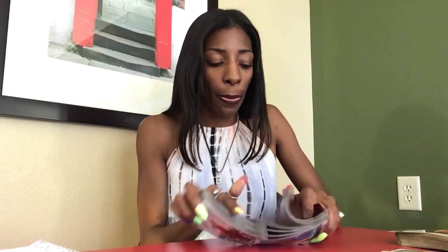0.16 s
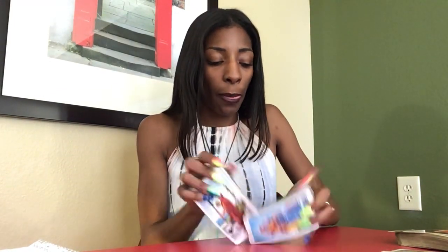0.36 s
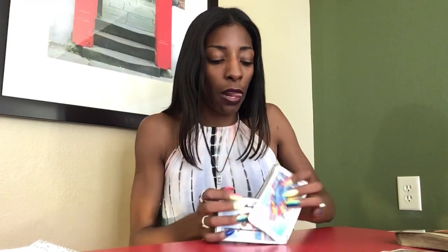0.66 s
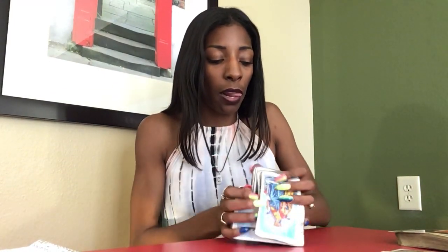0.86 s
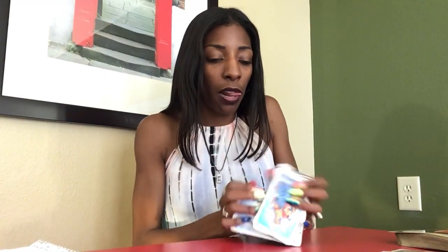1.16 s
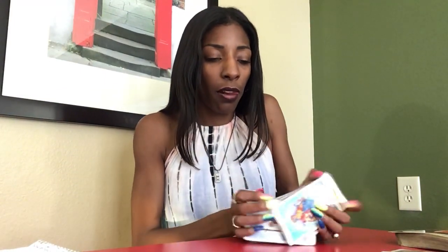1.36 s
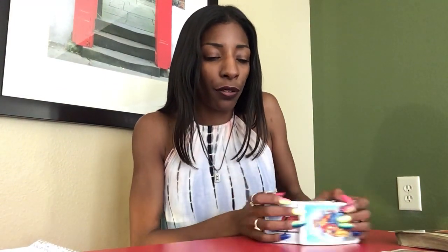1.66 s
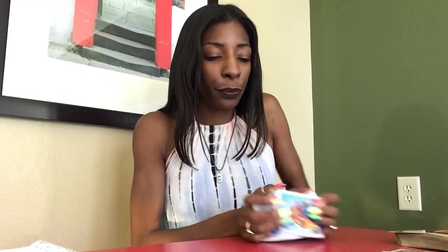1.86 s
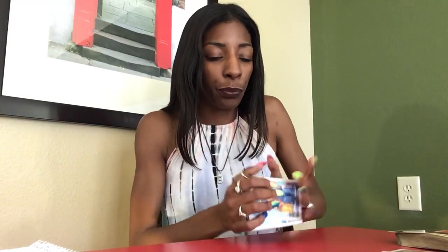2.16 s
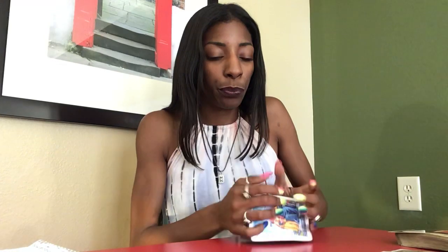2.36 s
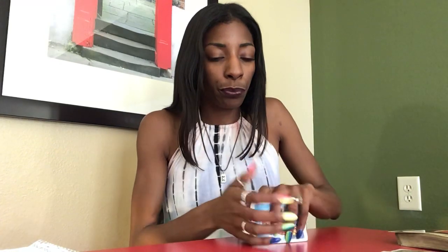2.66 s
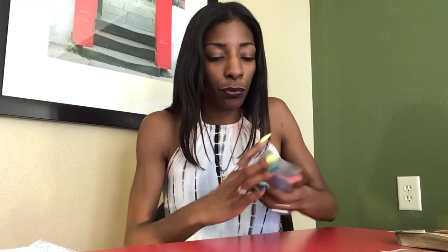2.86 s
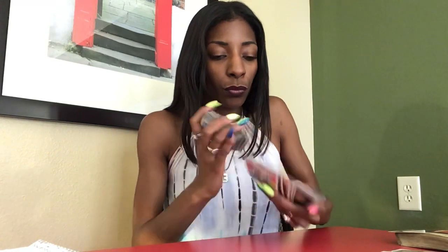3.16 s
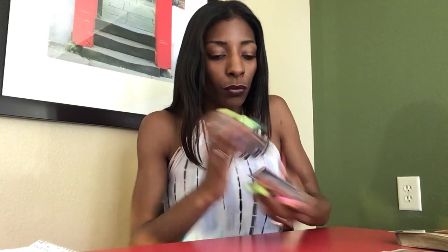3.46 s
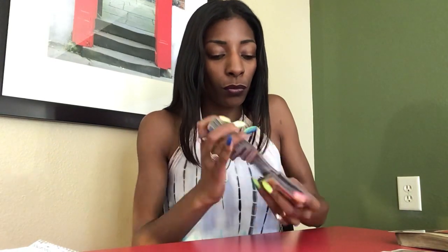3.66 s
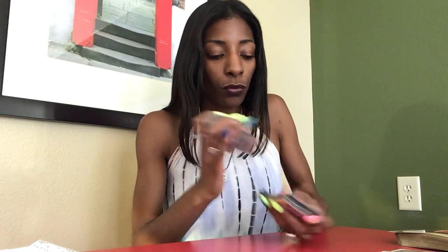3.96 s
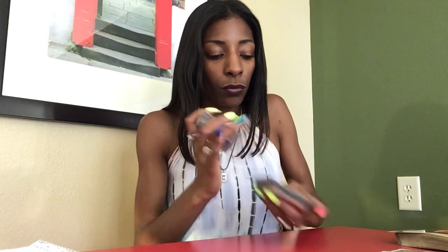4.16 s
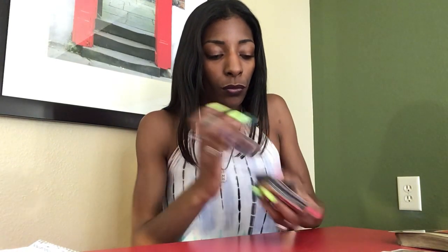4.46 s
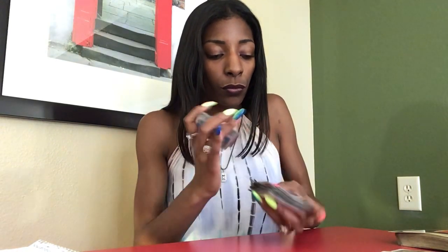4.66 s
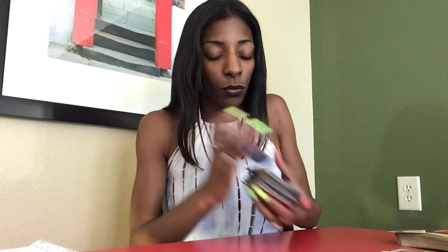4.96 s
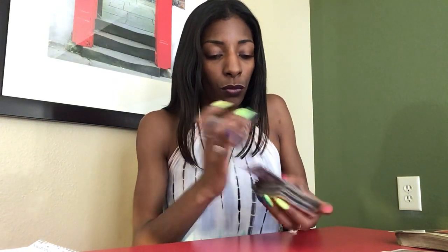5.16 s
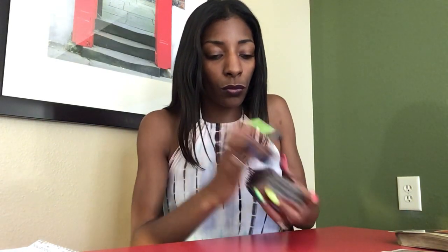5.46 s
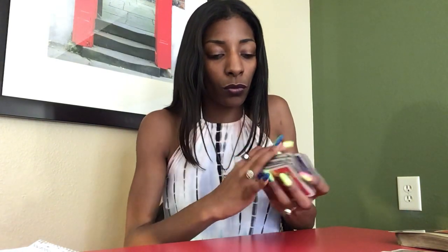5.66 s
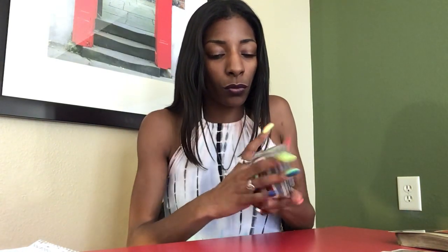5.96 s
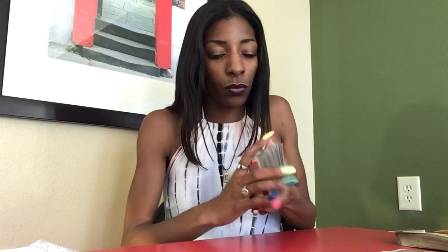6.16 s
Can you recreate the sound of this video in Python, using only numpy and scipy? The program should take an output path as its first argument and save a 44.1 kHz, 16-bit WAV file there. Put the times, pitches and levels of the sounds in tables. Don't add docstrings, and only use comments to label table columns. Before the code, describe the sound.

A stiff card deck riffles in a fast crackling burr, then is knocked square on a table and softly shuffled in the hand.

```python
import sys
import numpy as np
from scipy import signal
from scipy.fft import rfft, irfft
from scipy.io import wavfile

SR = 44100
rng = np.random.default_rng(int(sys.argv[2]) if len(sys.argv) > 2 else 0)


def voltage_ratio(level):
    return 10 ** (np.asarray(level, float) / 20)


def log_audio(samples):
    frames = np.atleast_2d(samples).T
    limited = np.clip(frames, -1, 1)
    pcm = np.round(limited * 32767).astype(np.int16)
    wavfile.write(sys.argv[1], SR, pcm)


N = 277830

# [t/s, level/dB, f/Hz, brightness/dB, length/ms]
RIFFLE_SNAPS = [(.1643, -25, 1230, -2, 2.5), (.1722, -29, 1822, -1, 3), (.1823, -37, 2120, -12.5, 3.8),
                (.1864, -27, 1577, -12.5, 2.6), (.1901, -29.5, 1640, 0.5, 2.8), (.1944, -19, 1300, 1, 1.8),
                (.1963, -22.5, 1169, 3, 2), (.2008, -32.5, 1815, -6, 3), (.2056, -20.5, 1506, -7.5, 2),
                (.2098, -33.5, 2720, -15, 2), (.2146, -23, 2293, -8, 3), (.2158, -18.5, 3588, 2.5, 2.6),
                (.2176, -19, 2020, 0, 2.3), (.2277, -18, 3584, -5.5, 2), (.2328, -22, 2116, -3, 2),
                (.2341, -23.5, 2011, 2.5, 2), (.2417, -17.5, 1408, -13.5, 3), (.245, -18, 982, -12, 2.1),
                (.2507, -25, 1395, -10.5, 2), (.2532, -20, 901.5, -8, 3), (.2617, -24.5, 1222, -14.5, 3),
                (.2702, -11, 2628, -10.5, 1.2), (.2708, -13.5, 1879, -10.5, 1.5), (.28, -29, 2605, -1.5, 2),
                (.2812, -20, 2875, -8.5, 2.5), (.2872, -14, 1468, -8, 1.5), (.2907, -29, 900, -8, 2),
                (.2955, -33, 3137, -6, 2.5), (.2981, -28, 3060, -9.5, 2), (.3014, -28, 3614, -6, 2.5),
                (.3135, -32, 2238, -6, 2), (.3167, -28, 1598, -11, 2), (.319, -20, 2534, -15.5, 3.5),
                (.323, -15.5, 2400, -9.5, 2.6), (.3261, -21, 1420, -9, 2), (.3292, -9.5, 2252, -14.5, 3.17),
                (.3386, -12, 2217, -8.5, 4.2), (.3421, -17, 1456, -11, 2.5), (.348, -14, 1770, -5, 2.6),
                (.3594, -28, 1545, 2, 2.4)]
# [t/s, level/dB, f/Hz, brightness/dB, length/ms]
CARD_PATS = [(1.052, -68, 2500, -6, 2.3), (1.3614, -44, 1560, -28.5, 2.4), (1.663, -59.5, 1026, -21.5, 4),
             (1.676, -49.5, 3870, -12.5, 3), (1.6865, -52, 1160, -5, 3.2), (1.776, -57, 4200, -10, 2),
             (1.832, -50, 3870, -10, 2), (2.0997, -47.5, 1690, -16, 3.4), (2.385, -19, 2000, -21.5, 6.3),
             (2.383, -30, 4200, -21, 14), (2.392, -30, 4200, -21.5, 11), (2.5455, -36.5, 1530, -30, 3.3),
             (2.558, -30, 2370, -25, 4.6), (2.9478, -69.5, 925, -8, 1.74), (3.012, -69.5, 4200, -9, 2.9),
             (3.132, -63.5, 2070, -9.5, 2), (3.205, -44.5, 2570, -11, 4.3), (3.66, -50, 700, -12, 4.8),
             (3.669, -57.5, 3120, -13.5, 3.3), (3.698, -57, 896, -13, 3), (4.188, -59.5, 1087, -14.5, 4.4),
             (4.255, -38, 1595, -20.5, 4.3), (4.9538, -52, 1890, -4.5, 3.3), (4.971, -52, 900, -11.5, 6.6),
             (4.9764, -53, 860, -11, 5.5), (4.992, -53, 1380, -12.5, 4), (5.0, -53, 1557, -9, 3.3),
             (5.243, -47, 664, -15.5, 3.5)]
# [t/s, level/dB, f/Hz, brightness/dB]
NAIL_TICKS = [(.0275, -59, 1760, -4), (.076, -46, 806, -8), (0.6459, -45, 1300, 5.5),
              (0.7135, -42, 3500, -1), (.792, -50, 4060, -8), (0.856, -44, 3720, -15),
              (0.871, -31.5, 3830, 0), (0.9536, -41, 2800, -8), (0.9661, -37.5, 3090, -7),
              (1.078, -37.5, 3050, -8), (1.106, -49, 1520, -7), (1.1628, -42, 3450, -9),
              (1.195, -39.5, 2600, -6.5), (1.2042, -48.5, 3170, -18), (1.312, -42.5, 1830, 3.5),
              (1.426, -59, 3610, -13), (1.4726, -46, 3720, -23), (1.5166, -63, 3780, 3.5),
              (1.698, -40.5, 2580, 3), (1.7515, -24, 3370, -5), (1.759, -26, 3000, -8),
              (1.8546, -41.5, 3680, -3.5), (2.0558, -46, 1640, -7), (2.0896, -37.5, 2810, -5),
              (2.3054, -55.5, 1650, -1.5), (2.435, -43.5, 4450, 6), (2.4505, -44.5, 4020, 4),
              (2.625, -39.5, 2400, 3.5), (2.6263, -34, 2400, 0), (3.072, -57.5, 1132, 2.5),
              (2.1332, -46, 3000, 1.5)]
# [t/s, level/dB, f/Hz, length/ms]
EDGE_BLOWS = [(.0655, -49.5, 570, 4.4), (0.1444, -49, 780, 1), (0.6857, -48, 1400, 2.9),
              (.696, -34.5, 1100, 3.7), (0.8342, -30, 1470, 2.9), (.8617, -45.5, 810, 9.2),
              (1.3625, -37.5, 776, 7.5), (1.3748, -52, 950, 1.1), (2.1201, -32, 1320, 2.4),
              (2.125, -42.5, 1070, 17), (2.186, -33, 1486, 3), (2.3714, -29.5, 2250, 20),
              (2.3768, -25, 1300, 8.5), (2.3834, -21, 1310, 12), (2.3912, -15.5, 2060, 14),
              (2.3974, -24.5, 1350, 3.7), (2.528, -27.5, 1670, 1.8), (2.5359, -38, 990, 3.5),
              (2.5483, -28, 1800, 5.8), (2.5567, -26, 1680, 3.2), (5.2308, -47.5, 860, 3.5),
              (5.2372, -53, 670, 12)]
# [t/s, level/dB, f/Hz, length/ms]
PACKET_SLAPS = [(2.7604, -36.5, 988, 3.3), (3.219, -42.5, 1153, 5.2), (3.24, -44.5, 1600, 1.9),
                (3.3735, -57, 2300, 14), (3.3968, -52, 1750, 7.4), (3.448, -50.5, 1750, 14),
                (3.5042, -48.5, 666, 14), (3.712, -43.5, 796, 2.4), (3.978, -59, 1474, 9),
                (3.9982, -44, 790, 13), (4.2525, -42.5, 964, 2.2), (4.398, -53, 1780, 2.9),
                (4.4185, -45.5, 1390, 2.65), (4.478, -51, 820, 4.5), (4.5129, -46.5, 692, 5.2),
                (4.6493, -56, 1820, 11), (4.6567, -36.5, 1890, 5), (4.661, -37, 1910, 4.5),
                (4.667, -45.5, 1736, 3.1), (4.7305, -45.5, 609, 17), (4.941, -51, 798, 4.4),
                (5.137, -55, 640, 17), (5.4535, -35, 710, 23), (5.4574, -39.5, 4060, 3.8),
                (5.465, -41, 4200, 5.6), (5.6288, -50, 650, 4.1), (2.6428, -48.5, 1390, 4.6),
                (5.774, -63, 1803, 2.5)]
# [t/s, level/dB]
CORNER_CATCHES = [(3.213, -44.5), (3.432, -51), (3.456, -53), (3.6, -56), (3.636, -50), (3.725, -47.5),
                  (3.8726, -51), (4.472, -45.5), (4.525, -46.5), (4.909, -55.5), (5.133, -49.5),
                  (5.38, -51)]
# [t/s, level/dB]
RIM_FLICKS = [(.2057, -29), (.2277, -24.5), (.2325, -35), (.2415, -36.5), (0.3015, -32.5), (.319, -31),
              (.3292, -28), (.3482, -16), (.3595, -32), (.3693, -32), (.2165, -27)]
# [t/s, level/dB, f/Hz, length/ms]
PACKET_SPRINGS = [(.2708, -9.5, 3600, .8), (.6885, -37.5, 780, 8.9), (.6965, -29, 1400, 4.2),
                  (2.5281, -40.5, 4000, 2.2), (.3295, -16.5, 2300, 1.5), (4.6554, -39, 1900, 1.3),
                  (.8562, -40, 3700, 3.2), (.2418, -20.5, 1901, 2), (.2535, -21, 1300, 1.5),
                  (1.0813, -46.5, 2900, 1), (1.164, -50, 1500, 1.5), (1.196, -40.5, 3700, 1.3),
                  (1.7525, -43, 800, 5), (2.1206, -39, 2310, 1.6), (2.1865, -34, 2130, 1.8),
                  (2.384, -11.5, 1210, 5), (2.3865, -11, 2060, 2.4), (2.3916, -11.5, 2056, 3.4),
                  (2.3957, -12.5, 1330, 3.1), (2.5482, -25, 2430, 3.3), (2.5568, -18, 1470, 2.14),
                  (2.5566, -23, 2450, 2.7), (3.2125, -34.5, 2720, 2.4), (3.2197, -39, 2600, 2.5),
                  (3.2414, -44.5, 1550, 1.5), (3.428, -53.5, 2750, 2.2), (3.4538, -47, 3040, 3),
                  (3.503, -46.5, 520, 3), (3.668, -49.5, 3150, 5), (3.726, -48.5, 2700, 2.9),
                  (4.2537, -39.5, 1106, 2.7), (4.397, -42.5, 1150, 1.7), (4.3968, -47, 2400, 1.8),
                  (5.157, -54.5, 2890, 2), (5.2312, -37, 900, 2.2), (5.2315, -41.5, 1610, 3)]
# [t/s, peak level/dB, low modes/dB, high modes/dB]
TABLE_KNOCKS = [(0.07, -50, 14, -5), (0.162, -35.5, 14, -2.5), (0.196, -21, 3, -10.5), (0.213, -27, 3, -8),
                (0.23, -25.5, -21, 1), (0.242, -25, 13, -1.5), (0.268, -24.5, 14, -2), (0.288, -31, 15, 2),
                (0.318, -22, 3, -8), (0.332, -20, -19, -3.5), (.348, -26, 11, -7), (0.6888, -21, 3, -8),
                (0.697, -16, 5.5, -6), (0.863, -41, 10, 3), (0.9, -38, -9, -6), (1.251, -36, 7, -19),
                (1.361, -24.5, 6.5, -10.5), (1.427, -39, -1.5, -19.5), (1.647, -38, -9.5, -10),
                (1.733, -32, -11, -15.5), (1.806, -32.5, -15, -12), (2.095, -39, 11.5, -4.5),
                (2.122, -33, -26, -6.5), (2.136, -33, -18.5, -7.5), (2.186, -35.5, -23, -6),
                (2.373, -18.5, -30.5, -29), (2.391, -14, -17, -20.5), (2.528, -29, 1, -9),
                (2.557, -19.5, 7.5, -11), (2.763, -30, -27.5, -10)]
# [t/s, peak level/dB]
PALM_THUDS = [(3.208, -55), (3.504, -50.5), (3.997, -46), (4.252, -42), (4.514, -46.5), (4.73, -42.5),
              (5.231, -40.5), (3.66, -60), (3.725, -52.5), (4.42, -54.5), (4.97, -59.5), (5.453, -48),
              (5.63, -56.5)]
# [f/Hz, t60/s, level/dB]
KNOCK_MODES = [
    [(106, 0.081, -9.5)],
    [(157.2, 0.13, -6), (250, 0.089, -17)],
    [(307, 0.05, 2.5), (378, 0.033, -1)],
    [(498.3, 0.024, 0.5), (646, 0.033, 1)],
]
# [f/Hz, t60/s, level/dB]
WOOD_MODES = [(637.4, 0.07, -22.5), (830, 0.054, -6.5), (1160, 0.063, -6.5), (1390, 0.047, -9.5),
              (1750, 0.075, -21)]
# [t/s, length/s, rub level/dB, rub f/Hz, hiss level/dB]
SETTLING_SLIDES = [(.065, 0.016, -56.5, 730, -68), (.141, 0.014, -52, 1120, -73),
                   (.648, 0.039, -60, 2830, -56.5), (.697, 0.04, -51, 1100, -71),
                   (.836, 0.015, -48.5, 1010, -92), (1.351, 0.032, -70, 780, -81),
                   (2.402, 0.04, -43.5, 2473, -56), (2.4, .05, -57, 4036, -69),
                   (2.531, 0.082, -50, 1700, -74), (2.628, 0.022, -52, 1557, -63),
                   (2.757, 0.084, -63, 1262, -67), (3.205, 0.058, -53.5, 2410, -59),
                   (3.372, 0.043, -66.5, 2340, -73), (3.656, 0.035, -58, 2800, -56),
                   (4.395, 0.057, -60, 1195, -67.5), (4.46, 0.053, -62, 1610, -60.5),
                   (4.511, 0.036, -60.5, 1064, -59.5), (4.654, 0.11, -57.5, 1550, -62),
                   (5.458, 0.053, -62, 4690, -65), (5.821, 0.066, -78, 1420, -68.5)]
# [t/s, length/s, rub level/dB, rub f/Hz, hiss level/dB]
EVEN_DRAWS = [(.868, 0.068, -60, 2900, -88), (1.54, 0.056, -69, 3800, -73),
              (1.753, 0.074, -58, 3214, -66.5), (3.428, 0.11, -62.5, 2575, -66),
              (3.6, 0.026, -75.5, 1250, -73), (3.632, 0.023, -61, 2770, -71),
              (3.699, 0.046, -59, 1500, -63), (4.187, 0.11, -60.5, 1467, -65),
              (4.891, 0.06, -69.5, 1269, -65), (5.127, 0.08, -62, 2400, -60.5),
              (5.229, 0.028, -54.5, 1070, -65.5), (5.378, 0.059, -62, 2860, -61),
              (5.632, 0.045, -60.5, 1637, -58.5), (5.982, 0.041, -84.5, 1005, -80),
              (6.099, 0.048, -82, 1198, -70.5)]
# [t/s, length/s, rub level/dB, rub f/Hz, hiss level/dB]
GATHERING_PUSHES = [(1.25, 0.088, -65.5, 2940, -72.5), (1.651, 0.063, -64, 2660, -74),
                    (1.89, 0.085, -70, 3880, -63.5), (2.056, 0.069, -58, 1134, -73.5),
                    (2.126, 0.033, -52.5, 1030, -64), (2.157, 0.026, -57, 3060, -60),
                    (2.999, 0.11, -94, 1280, -91), (3.859, 0.058, -69, 1530, -67),
                    (3.955, 0.066, -66, 1485, -64.5), (4.936, 0.068, -59, 1460, -67.5)]
# [t/s, length/s, rub level/dB, rub f/Hz, hiss level/dB, swell/dB]
THUMB_FANNING = [
    (0.189, .172, -32.5, 2124, -37.5, 0.00093),
]
# [t/s, level/dB]
FINGER_SHIFTS = [
    [(0.0, -63.5), (0.13, -64.5)],
    [(0.56, -57), (1.07, -64.5), (2.0, -59), (2.19, -70.5), (2.4, -58), (2.57, -64), (2.84, -79),
     (3.04, -65), (3.39, -62.5), (4.24, -67), (4.38, -65.5), (4.99, -68), (5.39, -62), (5.9, -67.5),
     (6.3, -70)],
]
# [f/Hz, level per Hz/dB]
RUB_SPECTRUM = [(300, -2.5), (600, -3.5), (1200, -6.5), (2500, -7), (4000, -10), (7000, -25)]
# [f/Hz, level per Hz/dB]
HISS_SPECTRUM = [(3000, 1.5), (5000, 1), (8000, -1), (11000, 0), (14000, -2), (16000, -7)]
# [t/s, level/dB]
RING_CLINKS = [
    (5.4576, -74.5),
    (5.4640, -68),
    (5.485, -81.5),
]
# [centre f/Hz, spread/octaves, t60/s]
RING_CLUSTER = (4600, 0.24, 0.18)
# [f/Hz, t60/s, level/dB]
ROOM_BANDS = [(152.9, 0.76, -19.5), (540, 0.31, -9.5), (1300, 0.49, -18), (2400, 0.35, -18),
              (4200, 0.48, -14), (7500, 0.34, -13), (12500, 0.35, -10)]
# [f/Hz, level per Hz/dB]
AIR_SPECTRUM = [(28, -27.5), (45, 0), (57, 5), (76, -9.5), (110, 1.5), (145, -6.5), (190, -3), (290, -11.5),
                (400, -21), (800, -42), (2000, -35.5), (6000, -40), (12000, -43), (16000, -41.5)]


def rms_one(x):
    return x / np.sqrt(np.mean(x ** 2) + 1e-20)


def band(x, low_hz, high_hz):
    edges = [low_hz, min(high_hz, SR / 2.2)]
    return signal.sosfilt(signal.butter(2, edges, "band", fs=SR, output="sos"), x)


def steep(x, low_hz, high_hz):
    return band(band(x, low_hz, high_hz), low_hz, high_hz)


def coloured(x, spectrum):
    hz, level_db = np.transpose(spectrum)
    log_hz = np.log(np.maximum(np.arange(N // 2 + 1) * SR / N, 1))
    gain_db = np.interp(log_hz, np.log(hz), level_db, -90, -90)
    return rms_one(irfft(rfft(x) * voltage_ratio(gain_db), N))


def drift(rate_hz):
    r = np.exp(-2 * np.pi * rate_hz / SR)
    slow = signal.lfilter([1], [1, -2 * r, r * r], rng.standard_normal(N + SR))
    return rms_one(slow[SR:])


def ring(push, hz, t60):
    r, w = voltage_ratio(-60 / (t60 * SR)), 2 * np.pi * hz / SR
    return signal.lfilter([0, np.sin(w)], [1, -2 * r * np.cos(w), r * r], push)


def contacts():
    nail_ms, slap_bright_db = 1.7, -12
    corner = (2700, -2.5, 0.63)      # f/Hz, brightness/dB, length/ms
    rows = RIFFLE_SNAPS + CARD_PATS
    rows = rows + [(*row, nail_ms) for row in NAIL_TICKS]
    for s, level_db, hz, ms in EDGE_BLOWS:
        bright_db = -37 + 3.9 * max(level_db + 14, 0)
        rows = rows + [(s, level_db, hz, bright_db, ms)]
    rows = rows + [(s, level_db, hz, slap_bright_db, ms) for s, level_db, hz, ms in PACKET_SLAPS]
    return rows + [(*row, *corner) for row in CORNER_CATCHES]


def taps():
    deck_edge_hz, deck_edge_db = 4050, -25
    out, t = np.zeros(N + 2048), np.arange(2048) / SR
    rows = contacts()
    draws = rng.standard_normal((len(rows), 2, len(t)))
    fade = np.hanning(2 * len(t))[len(t):]
    snap_at = round(.0004 * SR)
    for (s, level_db, hz, bright_db, ms), (rough, edge) in zip(rows, draws):
        span = np.clip(ms, .5, 14) / 1000
        burst = np.minimum(t / 0.00079, 1) * np.exp(-2.5 * t / span) * fade
        rough[snap_at] = edge[snap_at] = -np.interp(ms, [1.8, 3.5, 7], [14, 5, 1])
        reach_hz = np.interp(bright_db, [-20, -6], [1.45 * hz, 4800])
        broad_db = np.interp(ms, [2.6, 6], [-5.5, -7.5])
        own_pitch = steep(rough * burst, hz * .65, hz * 1.279)
        broad = steep(rough * burst, max(400, 0.37 * hz), reach_hz)
        body = own_pitch + voltage_ratio(broad_db) * broad
        tick = band(edge * burst, 2500, 8500) + voltage_ratio(-8) * band(edge * burst, 9500, 15000)
        packed = steep(edge * burst, deck_edge_hz / 1.12, deck_edge_hz * 1.12)
        sound = body / np.abs(body).max()
        sound = sound + voltage_ratio(bright_db + 3.5) * tick / np.abs(tick).max()
        sound = sound + voltage_ratio(deck_edge_db) * packed / np.abs(packed).max()
        at = round(s * SR)
        out[at:at + len(t)] += voltage_ratio(level_db + 4.0) * sound
    return out[:N]


def flicks():
    out, t_ms = np.zeros(N), np.arange(256) / SR * 1000
    puffs = rng.standard_normal((len(RIM_FLICKS), len(t_ms)))
    for (s, level_db), puff in zip(RIM_FLICKS, puffs):
        at = round(s * SR)
        out[at:at + len(t_ms)] += voltage_ratio(level_db) * puff * np.exp(-t_ms / 1.5)
    return steep(out, 11800, 16200)


def springs():
    rise_ms = .5
    out, t_ms = np.zeros(N + 1024), np.arange(1024) / SR * 1000
    for s, level_db, hz, ms in PACKET_SPRINGS:
        at = round(s * SR)
        shape = np.minimum(t_ms / rise_ms, 1) * np.exp(-(t_ms / ms) ** 2)
        out[at:at + len(t_ms)] += voltage_ratio(level_db) * shape * np.sin(2 * np.pi * hz * t_ms / 1000)
    return out[:N]


def thuds():
    loose_top_db, table_top_db, riffle_end_s = 0.5, -17.5, .5
    palm_shares_db = (-6, -1, 1.5)
    rows = []
    for s, peak_db, low_db, high_db in TABLE_KNOCKS:
        top_db = high_db + (loose_top_db if s < riffle_end_s else table_top_db)
        rows.append((s, peak_db, low_db, high_db, top_db))
    return rows + [(*row, *palm_shares_db) for row in PALM_THUDS]


def knocks():
    s, peak_db, low_db, high_db, top_db = np.transpose(thuds())
    at, out = np.round((s + 0.0017) * SR).astype(int), np.zeros(N)
    for group, share_db in zip(KNOCK_MODES, [low_db, 0 * s, high_db, top_db]):
        for hz, t60, level_db in group:
            push = np.full(N, 1e-18)
            np.add.at(push, at, rng.choice([-1, 1], len(s)) * voltage_ratio(peak_db + share_db + level_db))
            soft = np.exp(-2 * np.pi * 1.68 * hz / SR)
            push = signal.lfilter([(1 - soft) ** 2], [1, -2 * soft, soft ** 2], push)
            out += ring(push, hz, t60)
    return steep(out, 80, 4000)


def wood():
    s, level_db, hz, bright_db, ms = np.transpose(contacts())
    dull_db = np.interp(bright_db, [-26, -14], [0, -25])
    at, out = np.round((s + 0.00085) * SR).astype(int), np.zeros(N)
    chance = rng.standard_normal((len(s), len(WOOD_MODES)))
    for (mode_hz, t60, mode_db), luck in zip(WOOD_MODES, chance.T):
        near_db = -7.5 * np.abs(np.log2(mode_hz / hz))
        push = np.full(N, 1e-18)
        push[at] = np.sign(luck) * voltage_ratio(level_db + dull_db + mode_db + near_db + 0.37 * luck)
        out += ring(push, mode_hz, t60)
    return steep(out, 510, 3100)


def strokes():
    kinds = [(SETTLING_SLIDES, -12), (EVEN_DRAWS, -3.5), (GATHERING_PUSHES, 5.5)]
    return [(*row, swell_db) for rows, swell_db in kinds for row in rows] + THUMB_FANNING


def slides():
    clumps = voltage_ratio(2.0 * drift(90))
    sizes = voltage_ratio(2.9 * np.minimum(rng.exponential(1, N), 3.6)) * rng.choice([-1, 1], N)
    catches = sizes * (rng.random(N) < 5000 / SR)
    rub = coloured(catches, RUB_SPECTRUM)
    hiss = coloured(rng.standard_normal(N) + 0.067 * catches, HISS_SPECTRUM)
    s, level_db = np.transpose(sum(map(list, FINGER_SHIFTS), []))
    shifting_db = np.interp(np.arange(N) / SR, s, level_db) - 9.5
    out = voltage_ratio(shifting_db) * (rub + voltage_ratio(-7.0) * hiss)
    for s, length, rub_db, hz, hiss_db, swell_db in strokes():
        at = round(s * SR)
        t = np.arange(min(round((length + .1) * SR), N - at)) / SR
        onset = np.interp(rub_db, [-68, -58], [.025, .003])
        swell = voltage_ratio(1.2 * swell_db * (np.minimum(t / length, 1) - .5))
        die_away = np.exp(-np.maximum(t - length, 0) / 0.009)
        stroke = np.minimum(t / onset, 1) * swell * die_away
        grain = rub[at:at + len(t)]
        flex = rms_one(band(grain, hz * .8, hz * 1.3))
        face = rms_one(band(grain, hz * .13, hz * 2.1))
        face = rms_one(face + voltage_ratio(-6.5) * flex)
        paper = voltage_ratio(hiss_db - 5.0) * hiss[at:at + len(t)]
        out[at:at + len(t)] += stroke * (voltage_ratio(rub_db - 1.5) * face + paper)
    return clumps * out


def clinks():
    s, touch_db = np.transpose(RING_CLINKS)
    centre_hz, octaves, t60 = RING_CLUSTER
    out = np.zeros(N)
    for place, luck in rng.standard_normal((40, 2)):
        push = np.full(N, 1e-18)
        push[np.round(s * SR).astype(int)] = voltage_ratio(touch_db + 1.3 * luck)
        out += ring(push, centre_hz * 2 ** (octaves * place), np.clip(t60, .05, .4))
    return out


def room():
    t = np.arange(SR // 2) / SR
    echo, noise = np.zeros(len(t)), rng.standard_normal((len(ROOM_BANDS), len(t)))
    for (hz, t60, level_db), white in zip(ROOM_BANDS, noise):
        tail = white * voltage_ratio(-60 * t / t60) * np.clip((t - .004) / 0.0015, 0, 1)
        tail = tail / np.sqrt(np.sum(tail ** 2))
        echo += voltage_ratio(level_db) * band(tail, hz / 1.5, hz * 1.5)
    return echo


def air():
    level_db = -59.5 + 1.6 * drift(4.3)
    return voltage_ratio(level_db) * coloured(rng.standard_normal(N), AIR_SPECTRUM)


def scene():
    cards = taps() + flicks() + knocks() + wood() + slides() + clinks()
    bent = springs()
    into_room = cards + voltage_ratio(-5) * bent
    echoes = signal.fftconvolve(into_room, room())[:N]
    return (cards + bent + echoes + air())[None]


def band_limit(x):
    return signal.sosfilt(signal.butter(12, 16660, fs=SR, output="sos"), x)


def record(dry):
    bass_cut = signal.butter(4, 56.2, "high", fs=SR, output="sos")
    top_cut = signal.cheby2(10, 50, 16700, fs=SR, output="sos")
    heard = signal.sosfilt(top_cut, signal.sosfilt(bass_cut, dry))
    return band_limit(heard)


dry = scene()
out = record(dry)
log_audio(out)
```